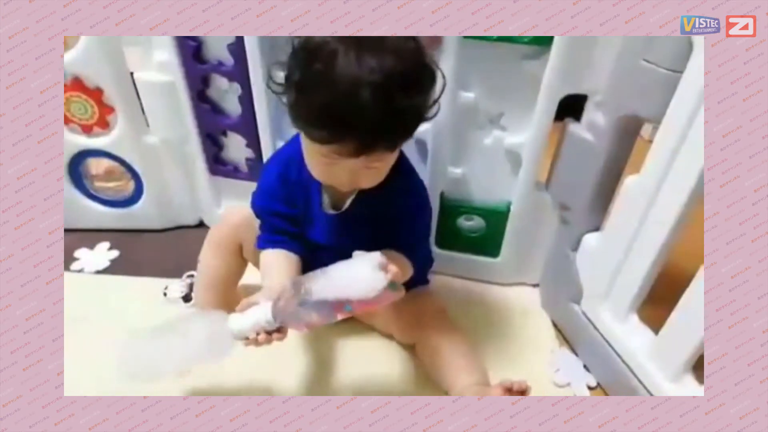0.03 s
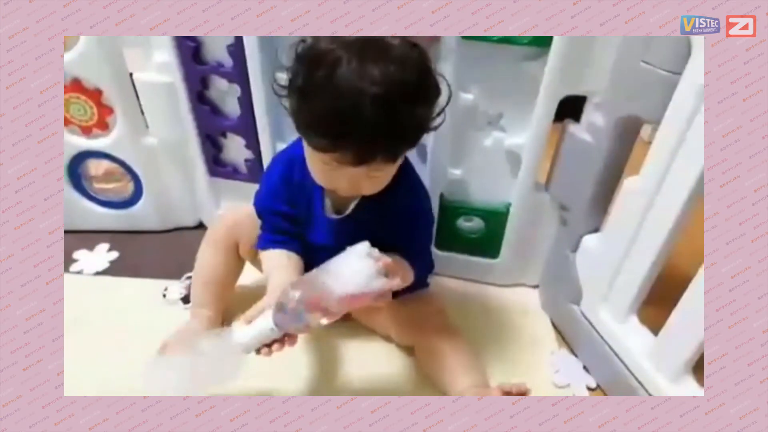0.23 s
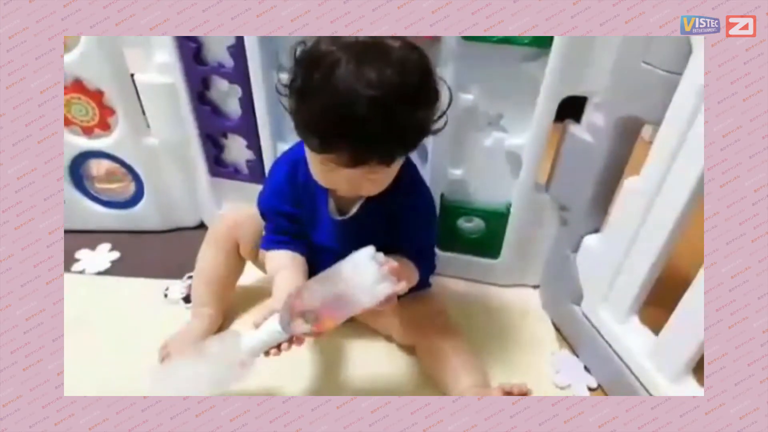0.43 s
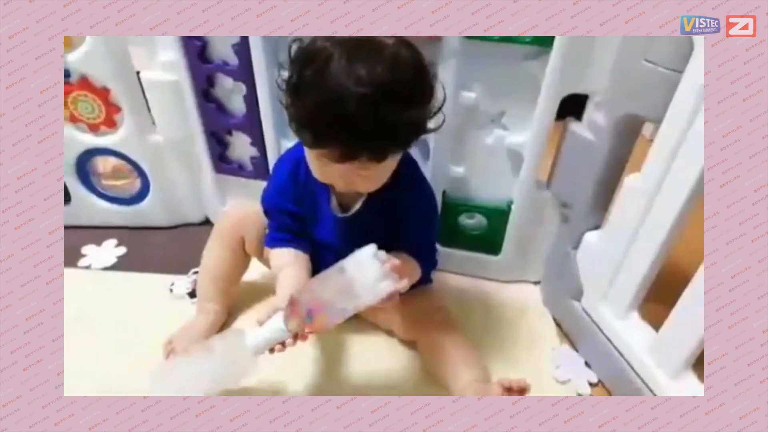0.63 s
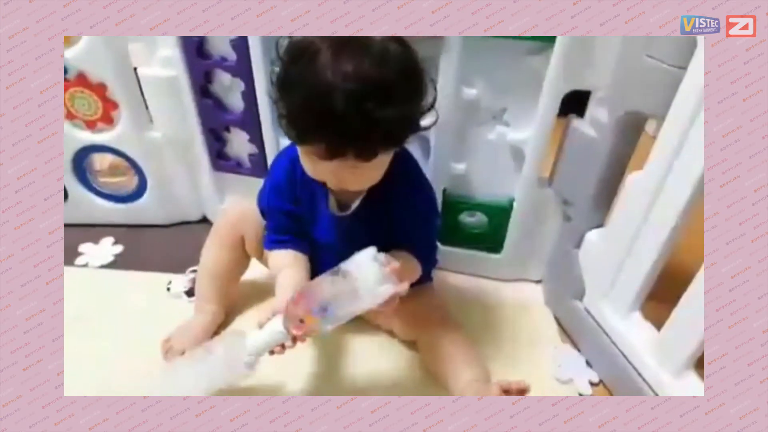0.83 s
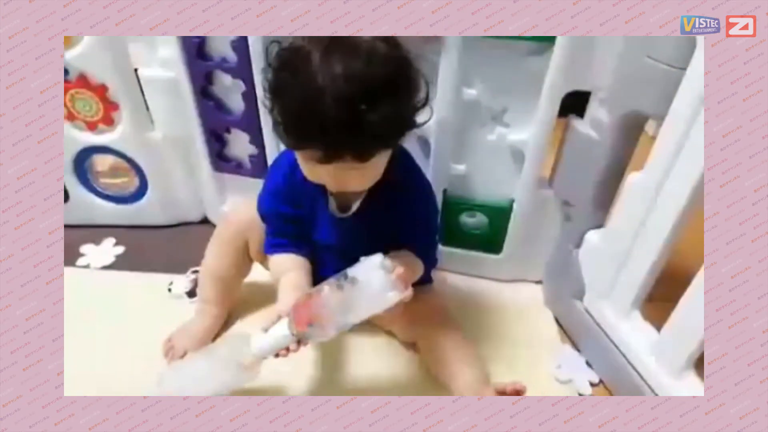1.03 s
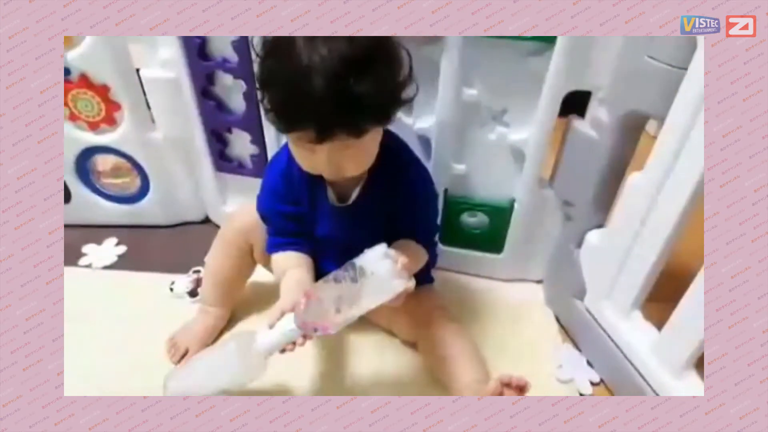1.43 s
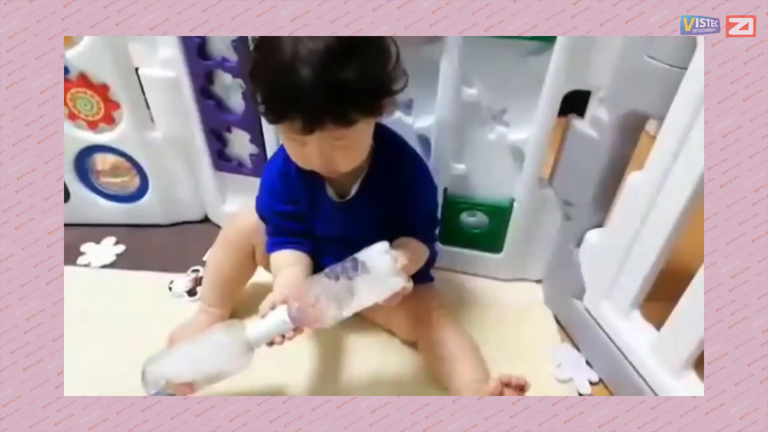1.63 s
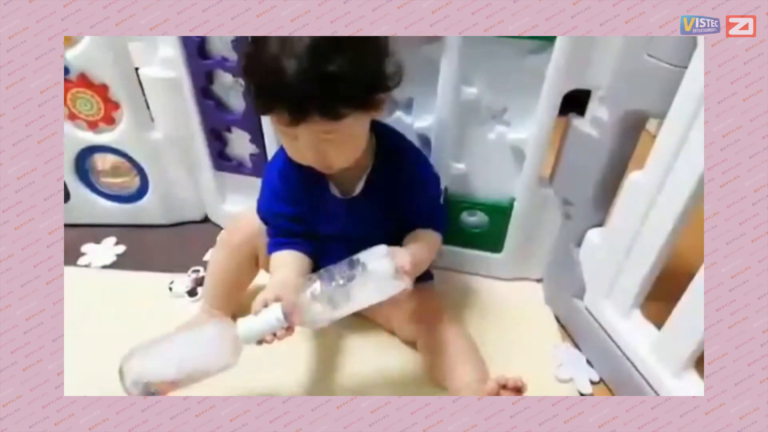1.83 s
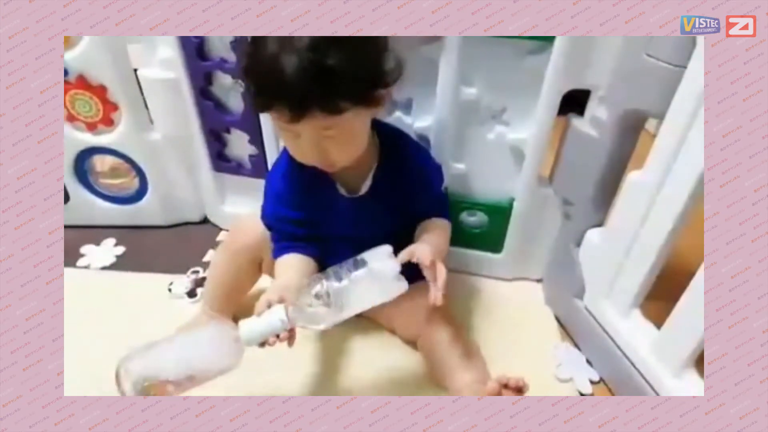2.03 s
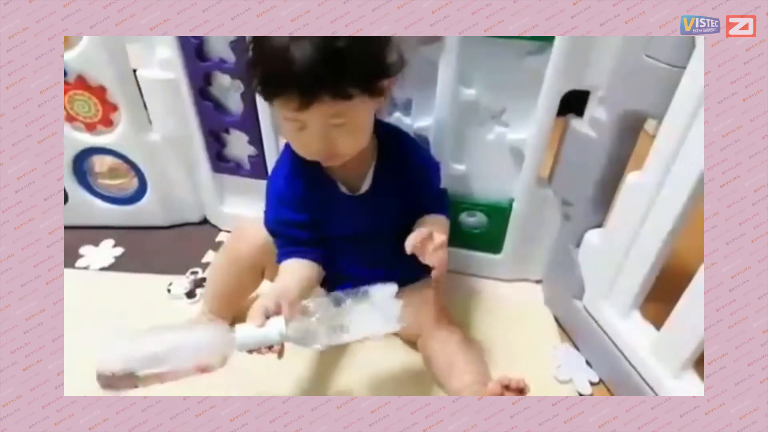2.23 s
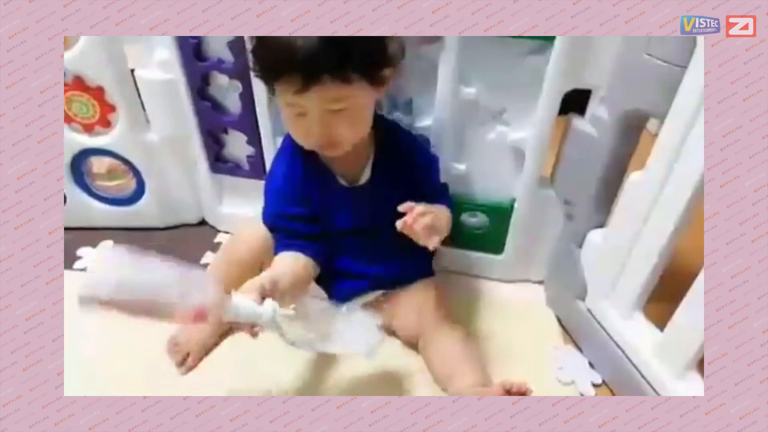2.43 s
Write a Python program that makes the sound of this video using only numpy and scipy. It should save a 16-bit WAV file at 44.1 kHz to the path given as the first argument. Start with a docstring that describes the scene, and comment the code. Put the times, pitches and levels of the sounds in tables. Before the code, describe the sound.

Light, crackly rattling of small bits tumbling through plastic bottles in a small room.

```python
"""Small hard pieces tumble inside two thin clear plastic bottles, joined at the necks and slowly tilted.
Each impact excites the resonances of the wall in a short crackle and sets the enclosed air ringing.
Between the knocks, lighter pieces patter and slide, and a child's hands rub softly on the plastic.
A small room adds a short reverberant tail and a steady low rumble."""
import sys
import numpy as np
from scipy import signal
from scipy.fft import rfft, irfft
from scipy.io import wavfile
from scipy.ndimage import uniform_filter1d

SR = 44100
rng = np.random.default_rng(int(sys.argv[2]) if len(sys.argv) > 2 else 0)


def to_wav(sig):
    """Store sig (one row per channel, or 1-D mono) as 16-bit WAV at the path in sys.argv[1].

    Samples outside -1..1 are clipped; the rate is SR.
    """
    pcm = np.clip(np.atleast_2d(sig), -1, 1) * 32767
    pcm = np.round(pcm).astype(np.int16)
    wavfile.write(sys.argv[1], SR, pcm.T)  # frames by channels


N = 110250

# Impacts on the wall. Each row: start in seconds, then levels in dB at 0.65-2.1, 2.1-3.7 and 3.7-5.6 kHz.
KNOCKS = [(0.1046, -102, -62, -51.5), (0.2005, -39.5, -38, -33.5), (0.2263, -43, -44, -42),
          (0.2654, -48, -47.5, -42.5), (0.3054, -55, -53, -39.5), (0.3115, -37, -40.5, -41),
          (0.3269, -38, -52, -46), (0.361, -42, -42.5, -39.5), (0.3748, -42.5, -46, -41.5),
          (0.3966, -47, -37, -36.5), (0.407, -41, -37, -34), (0.4223, -35, -46, -38),
          (0.444, -37, -34.5, -43), (0.4531, -34, -48, -39.5), (0.4939, -31, -38, -33.5),
          (0.5034, -37.5, -30.5, -31), (0.5109, -34.5, -48, -41), (0.522, -46, -42, -28.5),
          (0.5563, -37, -38, -45), (0.5764, -33, -34, -40), (0.596, -34.5, -49, -37),
          (0.6816, -47, -31.5, -26), (0.6893, -39, -30, -46), (0.7026, -35.5, -52, -38.5),
          (0.7535, -40, -34, -38.5), (0.8197, -41.5, -40, -33.5), (0.8466, -44, -32.5, -48),
          (0.8819, -37.5, -35, -34), (0.8991, -32.5, -45, -28), (0.9254, -33.5, -27.5, -37),
          (0.943, -32.5, -33, -36.5), (0.9558, -50, -33.5, -34.5), (0.9975, -47, -44, -36),
          (1.015, -47, -37, -29), (1.0649, -58, -33, -30.5), (1.0964, -40, -31, -33.5),
          (1.11, -37, -34, -37), (1.1185, -38, -32, -34.5), (1.1331, -41, -30, -37),
          (1.1883, -35, -28.5, -45), (1.2013, -46, -28.5, -39), (1.2113, -42, -33.5, -33.5),
          (1.239, -44, -26.5, -36), (1.2741, -61, -30, -38), (1.2889, -49, -36, -39),
          (1.3001, -39.5, -35, -32.5), (1.3271, -35.5, -37, -36.5), (1.345, -37, -41, -35.5),
          (1.3858, -39, -34, -34.5), (1.4274, -32, -40, -35.5), (1.433, -37.5, -34, -36),
          (1.4712, -47.5, -38, -35), (1.4879, -44, -34, -41), (1.4993, -38, -57, -45),
          (1.5246, -33.5, -28.5, -41), (1.5791, -43.5, -43.5, -38), (1.609, -45, -47, -37.5),
          (1.6495, -44, -37, -37), (1.6734, -43.5, -38, -35.5), (1.7472, -43.5, -37.5, -34.5),
          (1.8394, -41, -38.5, -34), (1.9217, -53, -48, -42.5), (1.9362, -36, -35, -42),
          (1.977, -45.5, -49, -43.5), (2.0333, -59, -54, -40.5), (2.0723, -49, -40.5, -38.5),
          (2.1515, -44.5, -47, -43.5), (2.209, -43.5, -62, -38.5), (2.2161, -43, -39.5, -47),
          (2.295, -80, -42, -47.5)]


def undb(db):
    """Amplitude ratio of a level in decibels."""
    return 10 ** (np.asarray(db) / 20)


def rms(x):
    """Effective amplitude: the root mean square."""
    return np.sqrt(np.mean(x ** 2) + 1e-20)


def convolve(x, impulse_response):
    """Output of a linear system, cut to the length of its input."""
    return signal.fftconvolve(x, impulse_response)[:len(x)]


def minimum_phase(points, size=4096):
    """Causal impulse response of a (Hz, dB) curve, by folding its cepstrum."""
    hz, db = np.array(points).T
    f = np.maximum(np.fft.rfftfreq(size, 1 / SR), 1)
    gain = undb(np.interp(np.log(f), np.log(hz), db))
    cepstrum = irfft(np.log(gain))
    cepstrum[1:size // 2] *= 2
    cepstrum[size // 2 + 1:] = 0
    return irfft(np.exp(rfft(cepstrum)))


def add(out, start_s, x):
    """Superposition: x joins the output at its start time."""
    i = int(np.clip(start_s * SR, 0, N - 1))
    out[i:i + len(x)] += x[:N - i]


def envelope(points):
    """Amplitude through (seconds, dB) points, held level beyond both ends."""
    return undb(np.interp(np.arange(N) / SR, *np.array(points).T))


def room_noise(level_db=-57):
    """Stationary filtered noise: a low rumble with a faint hiss."""
    # Each row: frequency in Hz, relative spectral density in dB.
    spectrum = [(25, -20.5), (65, -2.5), (88, -0.5), (200, -12.5), (500, -26), (1400, -16.5), (4500, -43),
                (14000, -58)]
    colour = rfft(minimum_phase(spectrum, size=16384), N)
    noise = irfft(rfft(rng.standard_normal(N)) * colour, N)
    return undb(level_db) * noise / rms(noise)


def contacts(count, rise_s=.0009, crack_s=.0025, flutter_s=.008, flutter_db=-13):
    """Impulsive excitation: each contact is a crack spreading through the wall, then a weak flutter."""
    t = np.arange(2048) / SR
    attack = np.minimum(t / rise_s, 1)
    decay = np.exp(-t / crack_s) + undb(flutter_db) * np.exp(-t / flutter_s)
    return rng.standard_normal((count, len(t))) * attack * decay


def wall_spot(shift_spread=.08, gain_spread_db=4.5, steady_above_hz=4000):
    """The wall's response depends on the point struck: low resonances vary, the bright ring stays."""
    # Each row: frequency in Hz, gain of the thin wall in dB.
    wall = [(560, -22.5), (720, -11), (1000, -9), (1300, -0.5), (1700, 6.5), (2080, -10), (2450, 0.5),
            (3000, 2.5), (3800, -9.5), (4650, 4), (5200, -9), (8000, -7.5), (14000, -31.5)]
    hz, db = np.array(wall).T
    shift, gain = rng.standard_normal((2, len(hz))) * (hz < steady_above_hz)
    spot_hz = np.sort(hz * np.exp(shift_spread * shift))
    return minimum_phase(np.column_stack([spot_hz, db + gain_spread_db * gain]))


def knocks(snap_db=-4, onset_s=.006):
    """Impacts excite three resonant bands of the wall; a treble snap follows their levels."""
    edges_hz = [650, 2100, 3700, 5600, 16000]
    bands = [signal.butter(4, band, "bandpass", fs=SR, output="sos")
             for band in zip(edges_hz, edges_hz[1:])]
    out = np.zeros(N)
    for (start, low, middle, high), burst in zip(KNOCKS, contacts(len(KNOCKS))):
        click = convolve(burst, wall_spot())
        snap = np.mean([low, middle, high, high]) + snap_db
        for sos, db in zip(bands, (low, middle, high, snap)):
            part = signal.sosfilt(sos, click)
            add(out, start, part * undb(db) / rms(part[:int(onset_s * SR)]))
    return out


def stirring(level_db=-12.5, settle_s=.015):
    """Amplitude of the pieces that knocks shake loose: incoherent powers add and decay exponentially."""
    power = np.zeros(N)
    settle = np.exp(-np.arange(N) / SR / settle_s)
    for start, *levels in KNOCKS:
        add(power, start, np.sum(undb(levels) ** 2) * settle)
    return undb(level_db) * np.sqrt(power)


def friction(band_hz, grain_s=.0065, depth_db=4.5):
    """Stick-slip friction: a noise band of unit RMS whose level catches and slips at random."""
    bandpass = signal.butter(2, band_hz, "bandpass", fs=SR, output="sos")
    lowpass = signal.butter(2, 1 / grain_s, fs=SR, output="sos")
    noise = signal.sosfilt(bandpass, rng.standard_normal(N))
    grip = uniform_filter1d(rng.standard_normal(N), int(grain_s * SR))
    noise *= undb(depth_db * signal.sosfilt(lowpass, grip) / rms(grip))
    return noise / rms(noise)


def patter(ticks_per_s=165, spread_db=3.5, slide_db=-7.5):
    """Shot noise of many light impacts over a sliding hiss, louder while the heap moves."""
    # Each row: time in seconds, level of the moving heap in dB.
    motion = [(.19, -64.5), (.22, -48.5), (.47, -56.5), (.55, -37), (.66, -46), (.71, -38), (.81, -45.5),
              (.93, -39), (1.28, -37), (1.42, -49), (1.67, -45.5), (1.74, -54.5), (2.0, -52.5), (2.06, -41),
              (2.13, -62), (2.19, -51), (2.5, -61)]
    impacts = np.zeros(N)
    ticks = [convolve(burst, wall_spot()) for burst in contacts(count=96)]
    gaps, sizes, picks = rng.random((1200, 3)).T
    for start, size, pick in zip(np.cumsum(2 * gaps / ticks_per_s), sizes, picks):
        if start < N / SR:
            tick = ticks[int(pick * len(ticks))]
            db = spread_db * min(-np.log(1 - size), np.e)  # many weak ticks, a few strong ones
            add(impacts, start, tick / rms(tick) * undb(db))
    heap = impacts / rms(impacts) + undb(slide_db) * friction(band_hz=(5000, 8360))
    return heap * np.hypot(envelope(motion), stirring())


def bottle_air(rattle):
    """Cavity resonance: the enclosed air rings on in damped modes after each contact."""
    # Each row: frequency in Hz, gain at resonance in dB, time to decay by 60 dB in seconds.
    air_modes = [(750, -9, .12), (1304, 4, .19), (1348, -3, .17)]
    t = np.arange(SR // 2) / SR
    ring = 0
    for hz, db, t60 in air_modes:
        damping = np.log(1000) / t60
        ring += undb(db) * 2 * damping / SR * np.exp(-damping * t) * np.cos(2 * np.pi * hz * t)
    return convolve(rattle, ring)


def room_tail(rattle, t60_s=.21, level_db=-6, build_s=.0014):
    """Reverberation: the diffuse reflections of a small furnished room build up and die away."""
    t = np.arange(SR // 2) / SR
    build = np.minimum(t / build_s, 1) ** 2
    tail = rng.standard_normal(len(t)) * np.exp(-np.log(1000) * t / t60_s) * build
    return undb(level_db) * convolve(rattle, tail / np.sqrt(np.sum(tail ** 2)))


def hands():
    """Friction of skin on plastic gives a soft, dull rubbing as the grip shifts."""
    # Each row: time in seconds, level in dB.
    rubbing = [(.55, -69), (.61, -57.5), (1.42, -63.5), (1.56, -71)]
    return friction(band_hz=(155, 397)) * envelope(rubbing)


def scene():
    """Knocks and patter drive the bottle air and the room; rubbing and rumble are superposed."""
    rattle = knocks() + patter()
    return (rattle + bottle_air(rattle) + room_tail(rattle) + hands() + room_noise())[None]


def record(dry, cutoff_hz=14400):
    """A steep elliptic low-pass filter removes the highest treble."""
    return signal.sosfilt(signal.ellip(10, .2, 70, cutoff_hz, fs=SR, output="sos"), dry)


dry = scene()
out = record(dry)
to_wav(out)
```